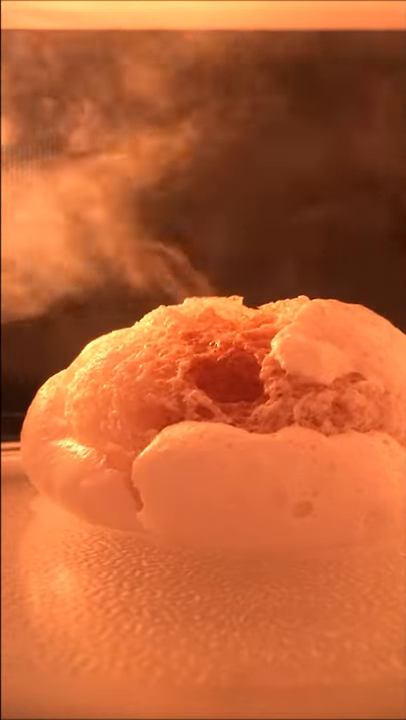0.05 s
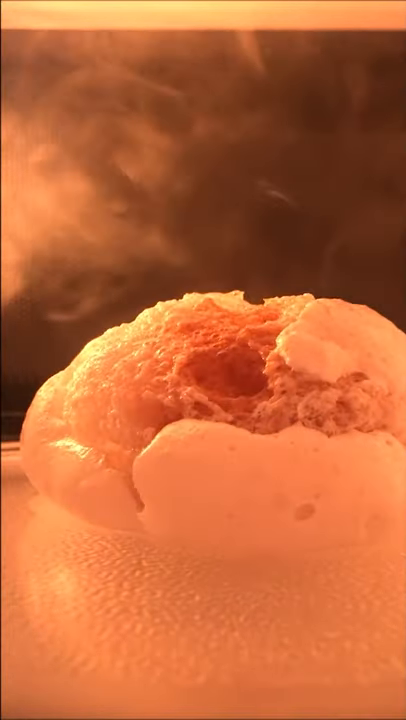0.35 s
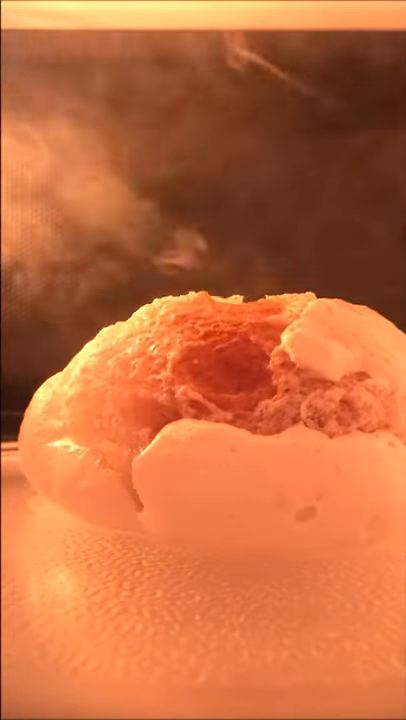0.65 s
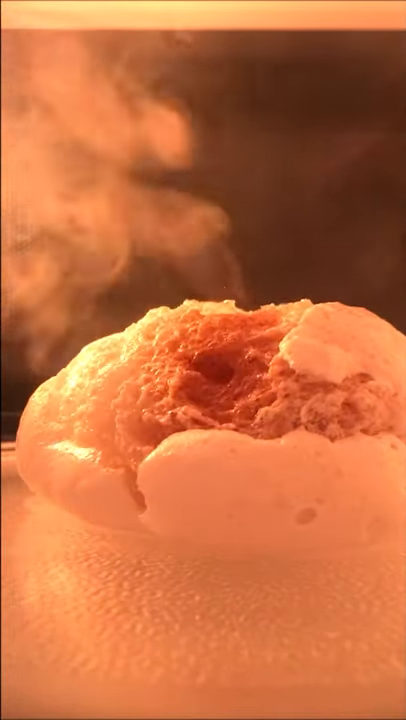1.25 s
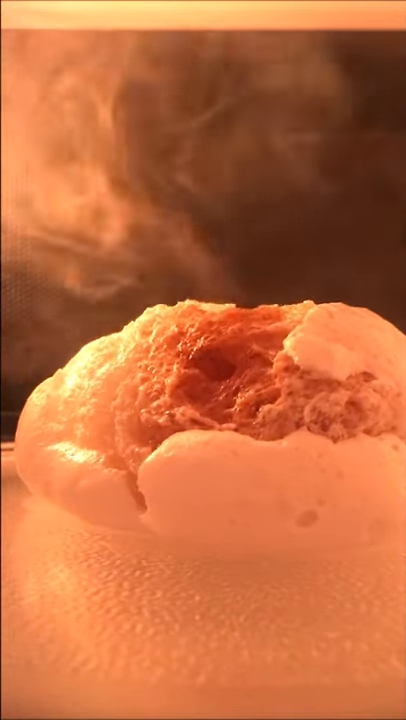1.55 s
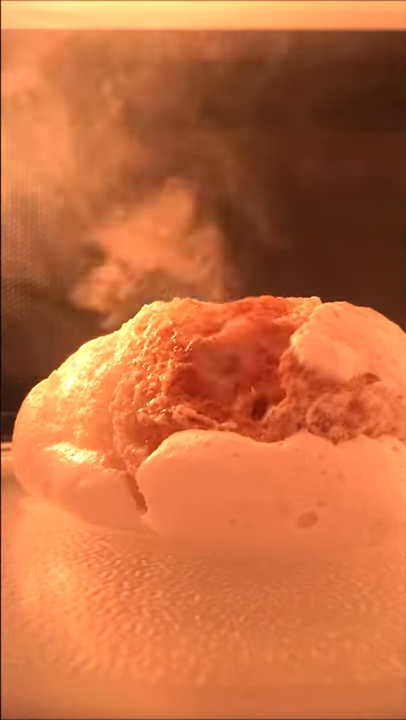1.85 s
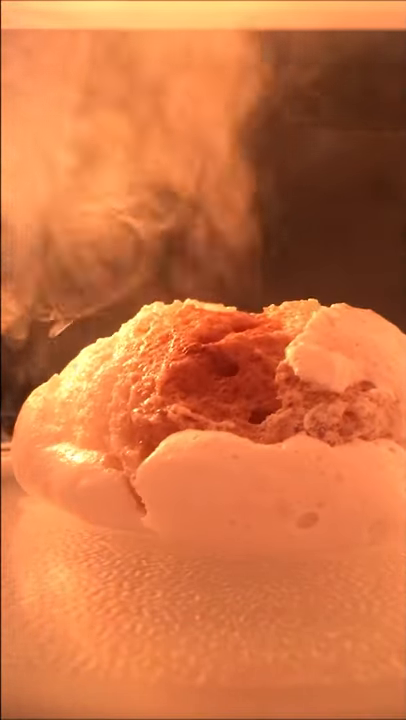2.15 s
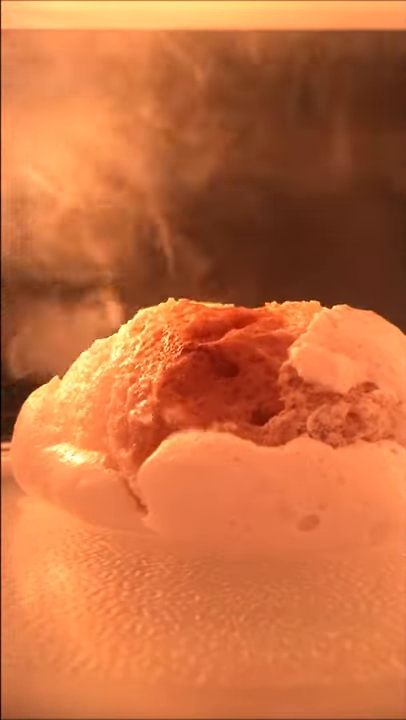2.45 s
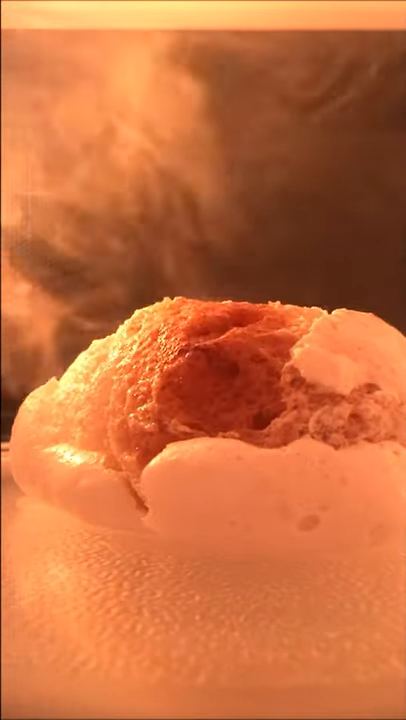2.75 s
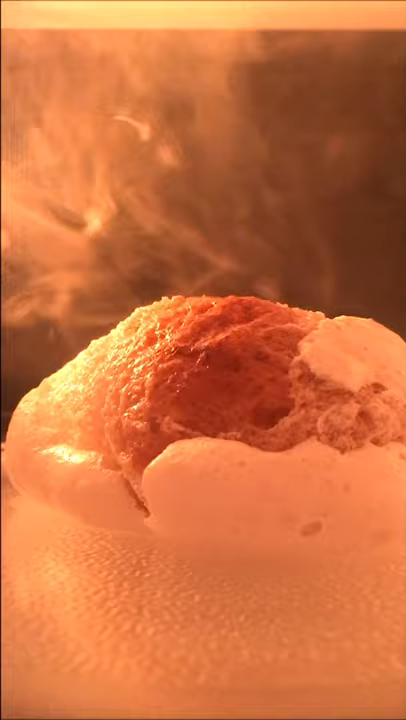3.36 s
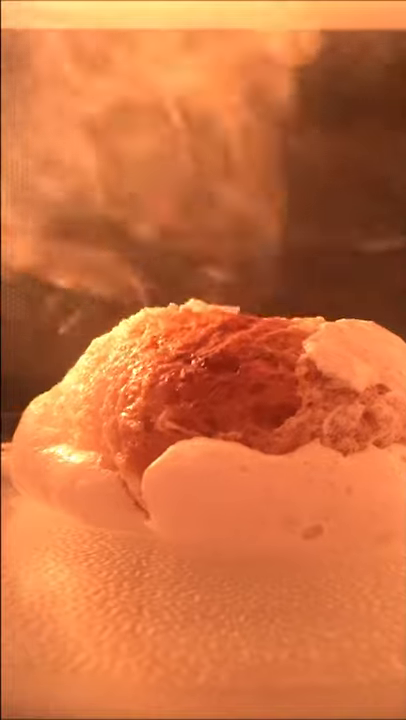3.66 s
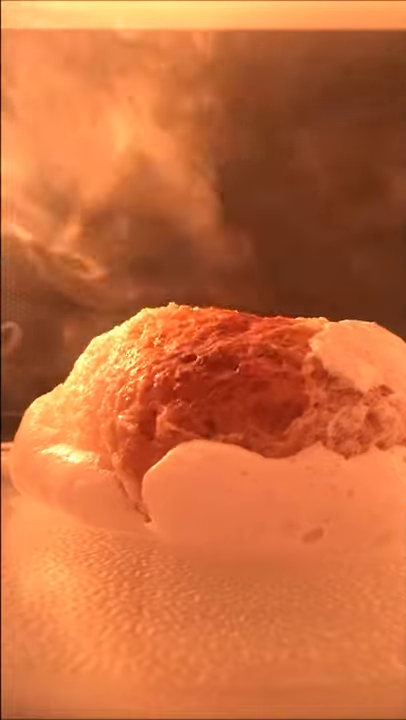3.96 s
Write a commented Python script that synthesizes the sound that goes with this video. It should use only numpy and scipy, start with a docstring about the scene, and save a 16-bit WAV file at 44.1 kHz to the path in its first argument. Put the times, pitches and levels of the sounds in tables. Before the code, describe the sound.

A microwave oven runs with a steady low hum and whirring.

```python
"""A kitchen, close to a microwave oven heating food. The transformer hums and beats against the fan
motor, the fan pushes air through the casing, and the turntable motor whines and rasps. Its gears whirr
in the metal cavity and chirp once a turn. The magnetron buzzes faintly, the food spits steam once,
and the treble drops out for a few instants."""
import sys
import numpy as np
from scipy import signal
from scipy.fft import rfft, irfft, next_fast_len
from scipy.io import wavfile
from scipy.ndimage import uniform_filter1d, map_coordinates

SR = 44100
rng = np.random.default_rng(int(sys.argv[2]) if len(sys.argv) > 2 else 0)


def wav_record(signal):
    """Record a signal, one row per channel, as 16-bit PCM in the file named by sys.argv[1]."""
    frames = np.transpose(np.atleast_2d(signal))
    bounded = np.clip(frames, -1, 1)
    # unit amplitude maps onto the largest positive 16-bit level
    quanta = np.round(bounded * 32767).astype(np.int16)
    wavfile.write(sys.argv[1], SR, quanta)


N = 176400
T = np.arange(N) / SR
MAINS_HZ, GEAR_TURN_S = 60.012, 0.3999


def amp(db):
    """Decibels to gain."""
    return 10 ** (np.asarray(db) / 20)


def unit(x):
    """Scale to rms 1."""
    return x / np.sqrt(np.mean(x ** 2) + 1e-20)


def noise(size=N):
    """White Gaussian noise."""
    return rng.standard_normal(size)


def filtered(x, response):
    """Apply a frequency response, given as a function of Hz."""
    size = next_fast_len(N + SR // 2)
    return irfft(rfft(x, size) * response(np.fft.rfftfreq(size, 1 / SR)), size)[:N]


def coloured(x, spectrum):
    """Shape x by (freq_hz, gain_db) points; rms 1."""
    freq_hz, gain_db = np.transpose(spectrum)
    return unit(filtered(x, lambda f: amp(np.interp(np.log(f + 1), np.log(freq_hz), gain_db))))


def ringing(x, hz, width_hz):
    """Two band-passes in series, each width_hz wide; rms 1."""
    return unit(filtered(x, lambda f: (1j * f * width_hz / (hz * hz - f * f + 1j * f * width_hz)) ** 2))


def wobble(rate_hz):
    """Smooth random curve with knots at rate_hz."""
    return map_coordinates(noise(N // 100), [T * rate_hz + 2], mode="mirror")


def tone(cycles, rms_db):
    """Sinusoid from a running cycle count."""
    return np.sqrt(2) * amp(rms_db) * np.cos(2 * np.pi * cycles)


# mains_multiple, level_db
TRANSFORMER_HARMONICS = [(1, -37.5), (2, -25.5), (3, -41.5), (4, -45.5), (6, -53.5), (7, -70.5), (8, -62),
                         (10, -62.5), (11, -55.5), (12, -64.5), (14, -61.5), (18, -55.5), (20, -77),
                         (21, -66.5), (22, -62)]
# shaft_multiple, level_db
FAN_ORDERS = [(4, -61.5), (6, -61.5), (8, -67), (9, -89), (10, -72)]
# time_s, shaft_hz
FAN_SPEED = [(0, 57.74), (.7, 57.72), (1.5, 57.57), (2.3, 57.57), (3, 57.76), (4, 57.87)]


def hum(beat_peak_s=0.01):
    """Transformer and fan motor: the shaft lags the mains, so their second harmonics beat at 4-5 Hz."""
    mains_cycles = MAINS_HZ * (T - beat_peak_s)
    shaft_turns = np.cumsum(np.interp(T, *np.transpose(FAN_SPEED))) / SR
    shaft_turns -= np.interp(beat_peak_s, T, shaft_turns)
    out = tone(2 * shaft_turns, rms_db=-27.3)
    for cycles, harmonics in ((mains_cycles, TRANSFORMER_HARMONICS), (shaft_turns, FAN_ORDERS)):
        for multiple, level_db in harmonics:
            phase = 0 if multiple == 2 else rng.random()
            waver = (0.028 + 0.0071 * multiple) * wobble(rate_hz=14)
            out += tone(multiple * cycles + phase, level_db) * (1 + waver)
    return out


# centre_hz, width_hz, gain_db
CAVITY_BANDS = [(1440, 90, 5), (1630, 80, -6), (1870, 80, 3), (2100, 70, -9), (2180, 70, 6), (2410, 50, -6),
                (2710, 40, 8), (2855, 50, 5), (2975, 110, -8), (3110, 90, 6), (4110, 80, 5), (4580, 50, 5),
                (5120, 60, 5), (5710, 50, 5)]


def cavity_gain(f):
    """Main resonances and gaps of the steel box."""
    return amp(sum(db / (1 + (2 * (f - hz) / width_hz) ** 2) for hz, width_hz, db in CAVITY_BANDS))


# freq_hz, gain_db
RUMBLE_SPECTRUM = [(20, -30), (40, -17), (60, -8), (80, -5), (95, -7), (115, -2), (145, 1), (175, -6),
                   (205, -9), (250, -15), (330, -26), (600, -50), (2000, -90)]
# freq_hz, gain_db
RUSH_SPECTRUM = [(100, 5), (300, 1), (420, 1), (600, 1.5), (720, -3.5), (785, -7.5), (900, -5.5),
                 (1300, -7), (2500, -4), (7000, -20.5), (8500, -17), (12000, -18), (15500, -27)]
# pitch_hz, half_width_hz, level_db
CASING_MODES = [(662, 14, -53), (1185, 18, -62.5)]


def fan_air(rumble_db=-40, rush_db=-46.5):
    """The fan rumbles; its air rushes through the box and stirs the casing's resonances."""
    rumble = amp(rumble_db) * coloured(noise(), RUMBLE_SPECTRUM)
    rush = amp(rush_db) * coloured(filtered(noise(), cavity_gain), RUSH_SPECTRUM)
    casing = sum(amp(db) * ringing(noise(), hz, 2 * half_hz) for hz, half_hz, db in CASING_MODES)
    return rumble + rush + casing


def gear_teeth(repeat_share=0.5, size_spread=0.53):
    """Grains of rubbing teeth: partly the same on every turn, partly new."""
    def grains():
        return unit(noise() * np.exp(size_spread * noise()))
    one_turn = grains()[:round(GEAR_TURN_S * SR)]
    return np.sqrt(repeat_share) * np.resize(one_turn, N) + np.sqrt(1 - repeat_share) * grains()


def cavity(x, t60_s=0.075, wet=0.85):
    """The steel box adds a short ring of many fine, evenly strong modes, then its main resonances."""
    t = T[:SR // 4]
    tail = noise(len(t)) * amp(-60 * t / t60_s)
    modes = 1 + wet * rfft(tail / np.linalg.norm(tail))
    local_rms = np.sqrt(uniform_filter1d(np.abs(modes) ** 2, size=50))
    impulse_response = irfft(modes / local_rms)[:SR // 8]
    return filtered(signal.fftconvolve(x, impulse_response)[:N], cavity_gain)


# cycles_per_turn, depth_nepers, peak_s
GEAR_LOAD = [(1, .29, .069), (3, .05, .067), (5, .12, .078), (6, .13, .016), (12, .11, .025),
             (36, .07, .009), (48, .09, .002)]
# freq_hz, gain_db
WHIRR_SPECTRUM = [(600, -30), (1300, -7.5), (2000, -5), (2800, -4.5), (3400, 2), (3850, 0.5), (4500, 3),
                  (5200, -2), (6400, -3), (7500, -15), (10000, -25.5), (15500, -28)]


def gear_whirr(level_db=-44.5):
    """The turntable gears swell and flutter under uneven load and ring in the cavity."""
    load = sum(depth * np.cos(2 * np.pi * per_turn * (T - peak_s) / GEAR_TURN_S)
               for per_turn, depth, peak_s in GEAR_LOAD)
    rubbing = gear_teeth() * np.exp(load)
    return amp(level_db) * coloured(cavity(rubbing), WHIRR_SPECTRUM)


# pitch_hz, level_db
MOTOR_WHINES = [(200, -59.5), (400, -66.5), (640, -66), (880, -70), (1421, -67), (1771, -70), (2160, -59.5),
                (2261, -62.5)]


def turntable_motor(rasp_db=-57.5, shake_nepers=0.21, waver_db=2):
    """Thin whines, and a rasp that pulses as the mains shakes the motor."""
    shake = np.exp(shake_nepers * sum(np.cos(2 * np.pi * k * MAINS_HZ * T) for k in (0.5, 1, 2)))
    rasp = amp(rasp_db) * ringing(gear_teeth() * shake, hz=2286, width_hz=158)
    whines = sum(tone(hz * T + rng.random(), db + waver_db * wobble(rate_hz=5.9))
                 for hz, db in MOTOR_WHINES)
    return rasp + whines


# freq_hz, gain_db
BUZZ_SPECTRUM = [(3000, -25), (7000, -6), (8200, 2), (9500, -7), (11000, -1), (12600, 0), (14200, -4),
                 (15500, -14)]


def magnetron_buzz(level_db=-66.5, decay_s=0.0008):
    """The same tiny crackle on every half cycle of the mains."""
    period = round(SR / MAINS_HZ)
    age_s = (np.arange(period) % (period / 2)) / SR
    crackle = np.resize(noise(period // 2 + 1), period) * np.exp(-age_s / decay_s)
    return amp(level_db) * coloured(np.resize(crackle, N), BUZZ_SPECTRUM)


def gear_chirp(first_s=0.228, sigma_s=0.01, start_db=-47.5, rise_db_per_s=1.1):
    """The gear scuffs at a tight spot once a turn, a little louder each time."""
    offset_s = (T - first_s + GEAR_TURN_S / 2) % GEAR_TURN_S - GEAR_TURN_S / 2
    swell = np.exp(-0.5 * (offset_s / sigma_s) ** 2)
    scuff = ringing(noise(), hz=3490, width_hz=340)
    return amp(start_db + rise_db_per_s * T) * swell * scuff


# freq_hz, gain_db
STEAM_SPECTRUM = [(1500, -25), (4500, 0), (7000, -11), (9000, -16), (12200, -5), (15500, -11)]


def food_spit(start_s=3.262, gain_db=-40, attack_s=0.003, decay_s=0.012):
    """Steam escapes from the food in one short hiss."""
    age_s = np.maximum(T - start_s, 0)
    puff = (1 - np.exp(-age_s / attack_s)) * np.exp(-age_s / decay_s)
    return amp(gain_db) * puff * coloured(noise(), STEAM_SPECTRUM)


def scene():
    """The running oven, mono."""
    steady = hum() + fan_air() + gear_whirr() + turntable_motor() + magnetron_buzz()
    return (steady + gear_chirp() + food_spit())[None]


# centre_s, half_length_s, depth_db
TREBLE_DIPS = [(.32, .008, 9), (1.014, .018, 22), (1.794, .011, 9), (2.217, .011, 8), (2.283, .008, 11),
               (2.859, .01, 10), (3.562, .01, 12), (3.967, .009, 12)]


def record(dry, treble_hz=6500, cutoff_hz=15740):
    """The treble dips briefly eight times; nothing passes above the cutoff."""
    treble = filtered(dry[0], lambda f: 1 - 1 / (1 + (f / treble_hz) ** 10))
    dip_db = sum(depth_db * np.exp(-np.square((T - centre_s) / half_s))
                 for centre_s, half_s, depth_db in TREBLE_DIPS)
    dipped = dry[0] + treble * (amp(-dip_db) - 1)
    return filtered(dipped, lambda f: f < cutoff_hz)[None]


dry = scene()
out = record(dry)
wav_record(out)
```